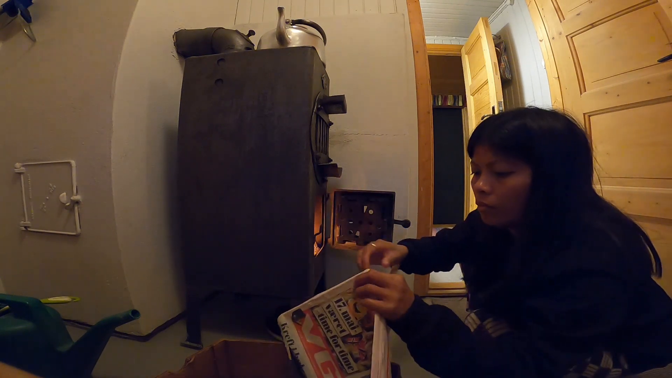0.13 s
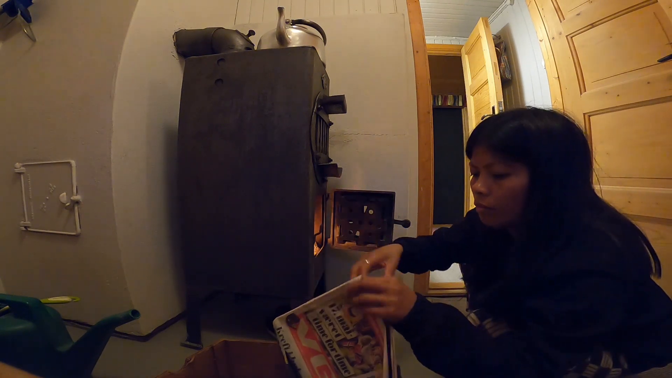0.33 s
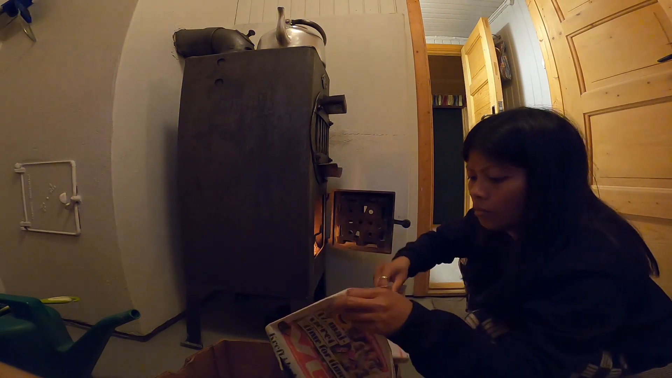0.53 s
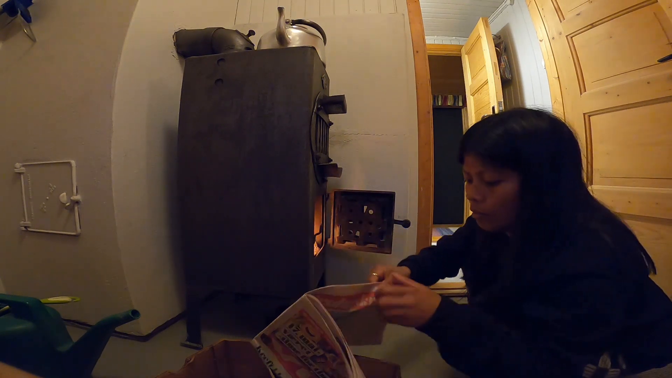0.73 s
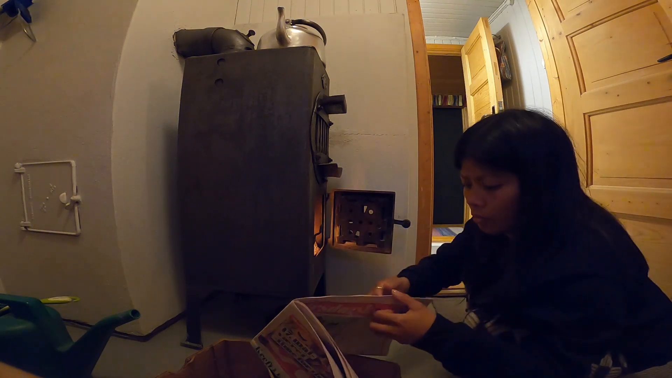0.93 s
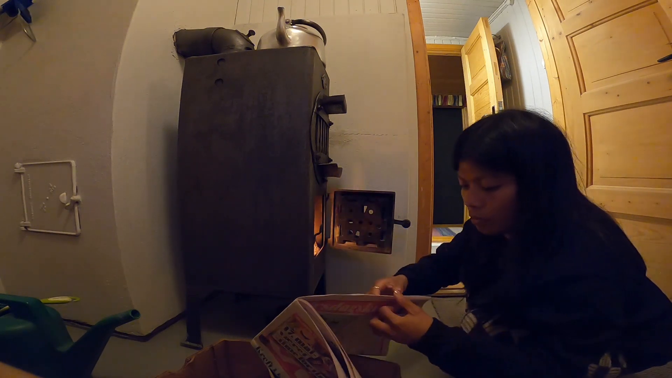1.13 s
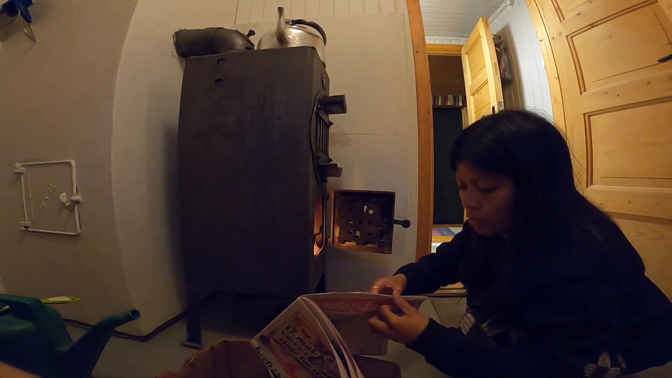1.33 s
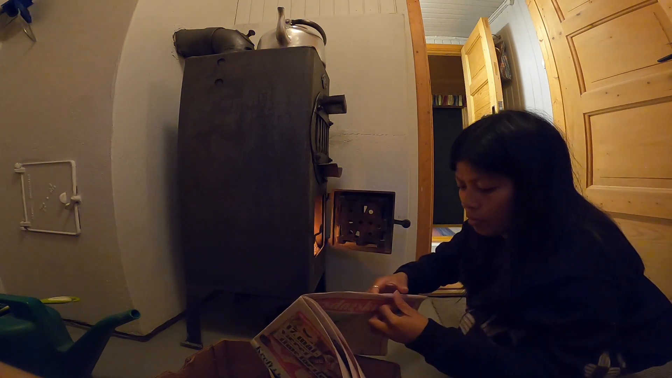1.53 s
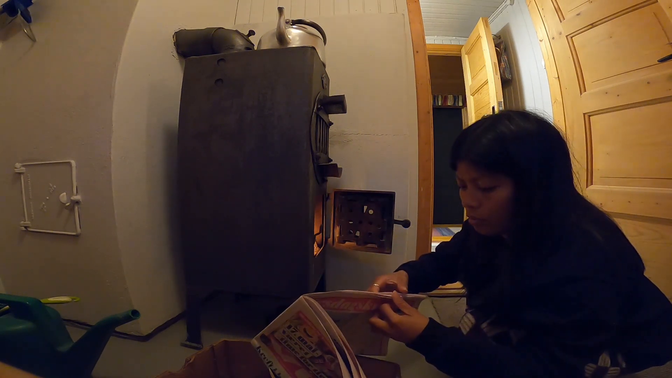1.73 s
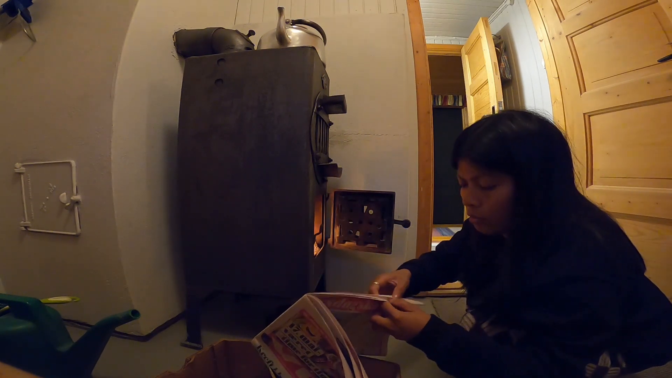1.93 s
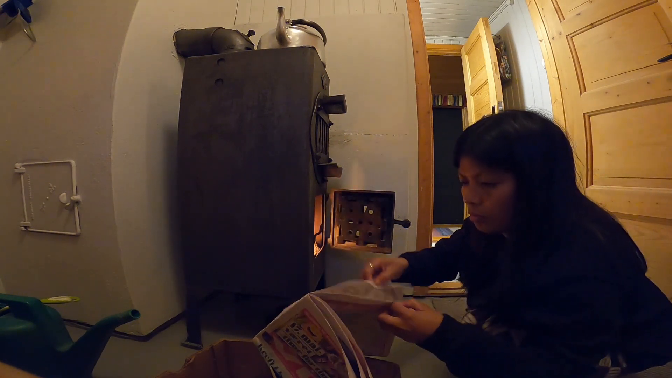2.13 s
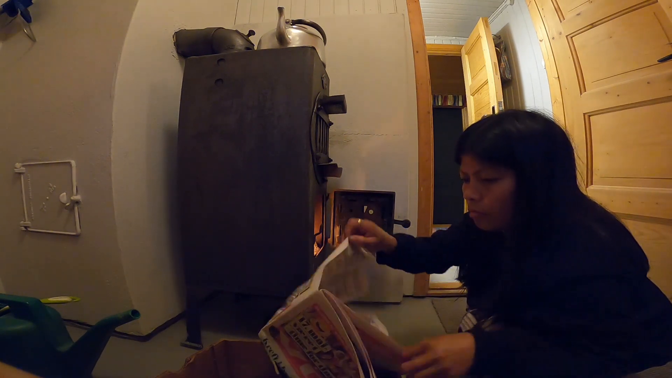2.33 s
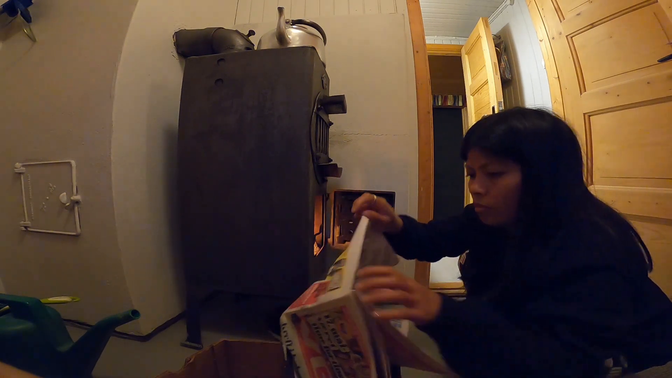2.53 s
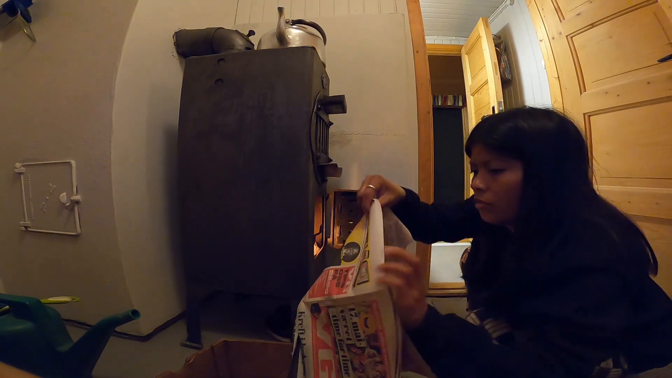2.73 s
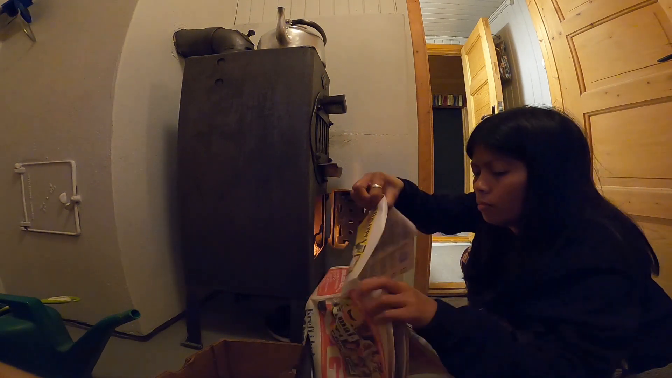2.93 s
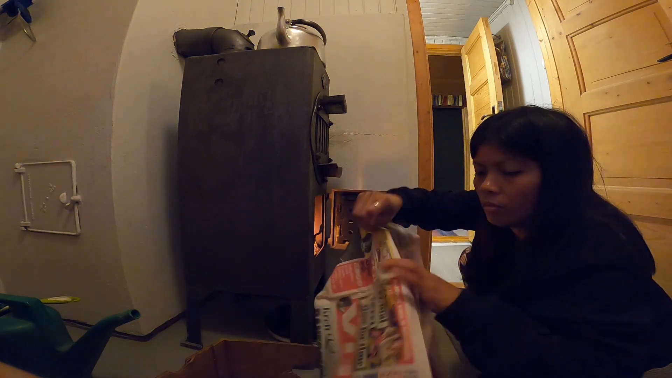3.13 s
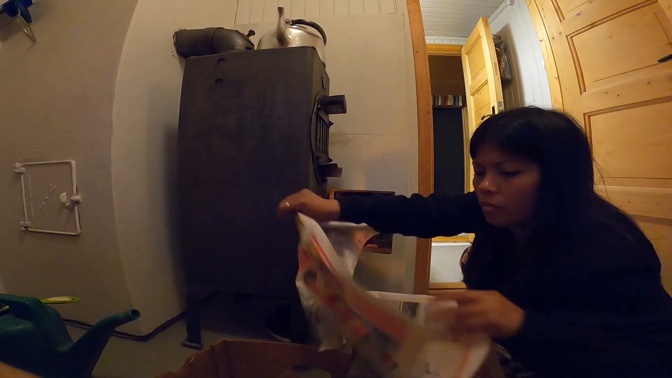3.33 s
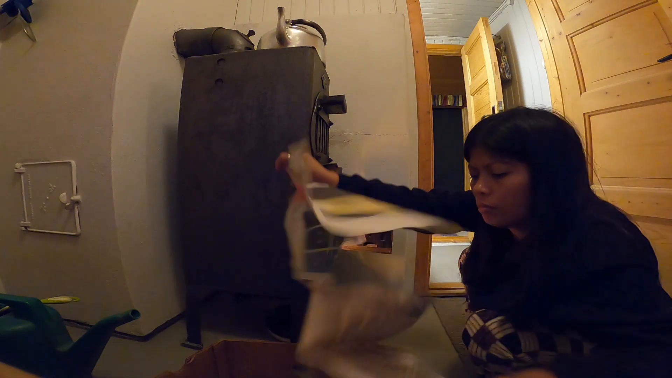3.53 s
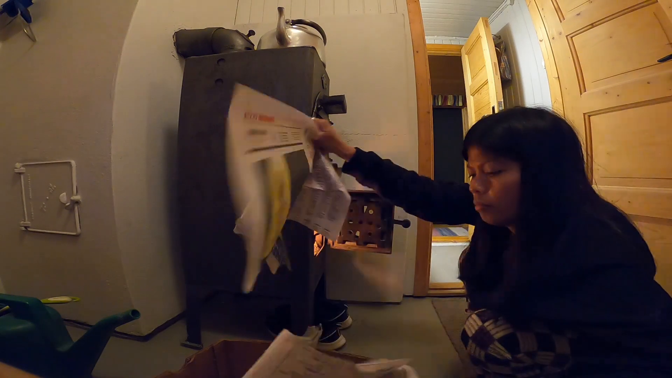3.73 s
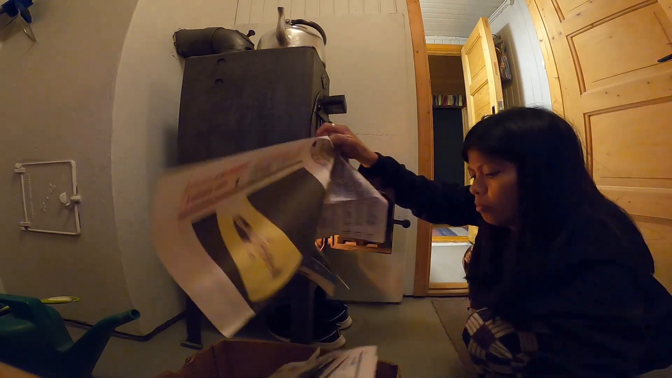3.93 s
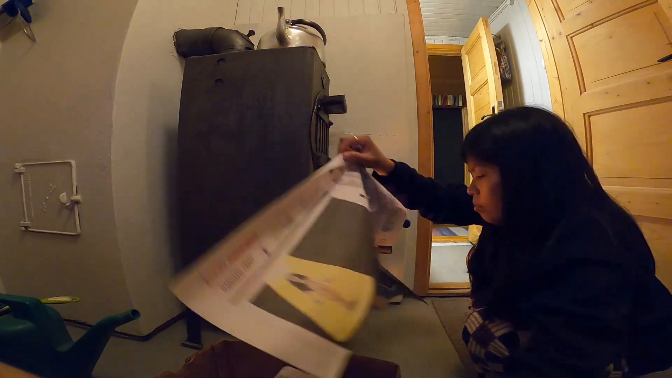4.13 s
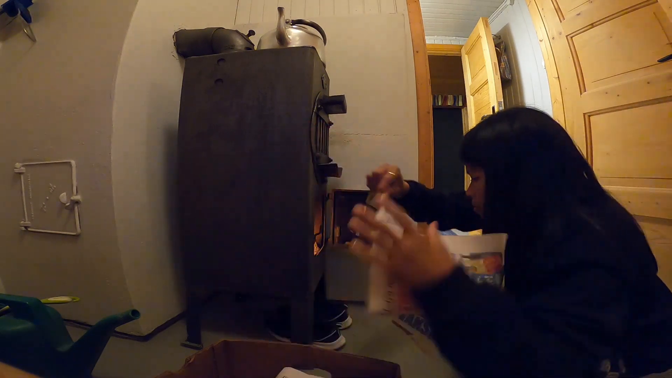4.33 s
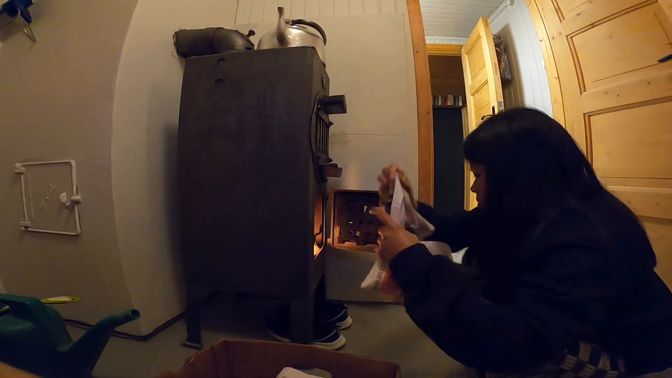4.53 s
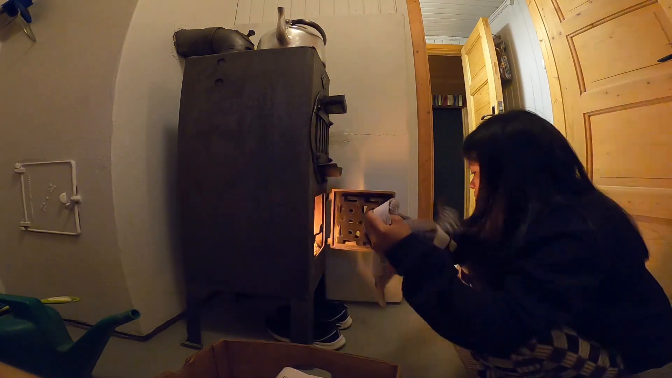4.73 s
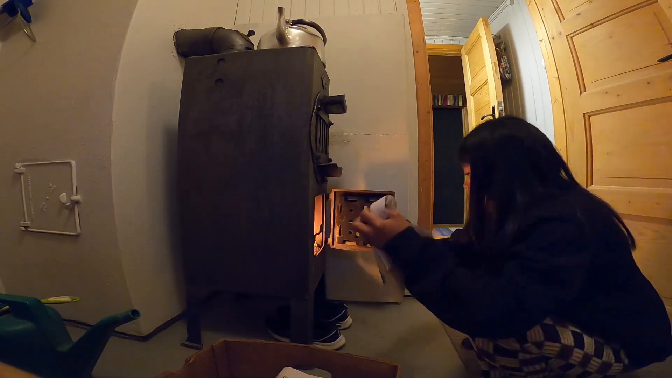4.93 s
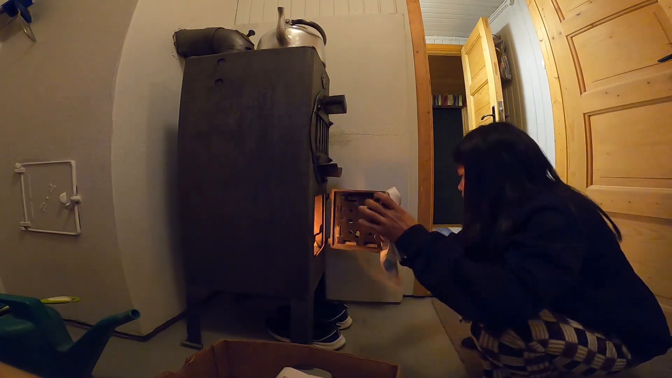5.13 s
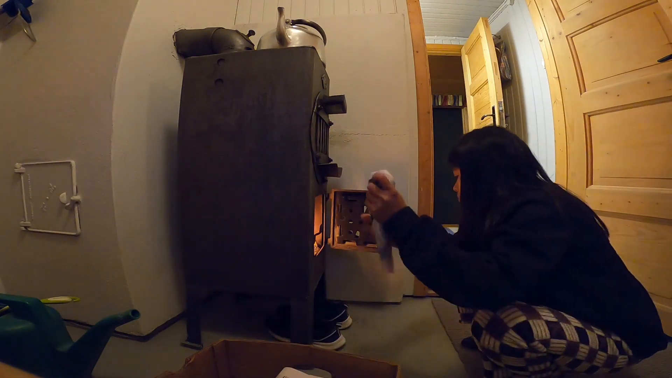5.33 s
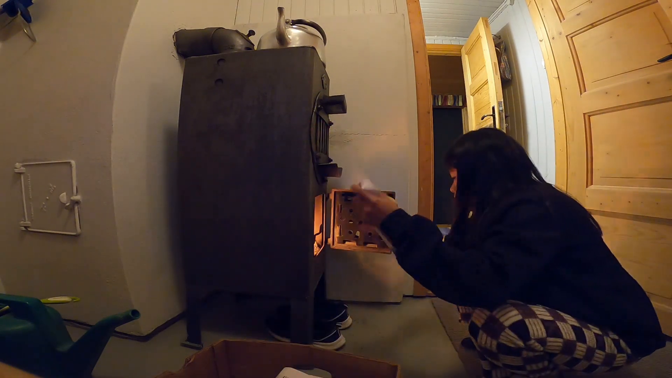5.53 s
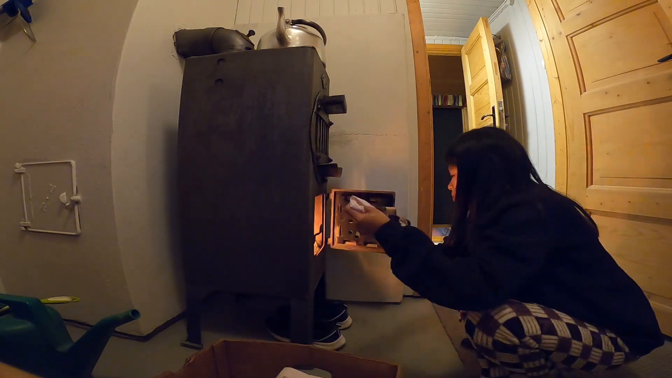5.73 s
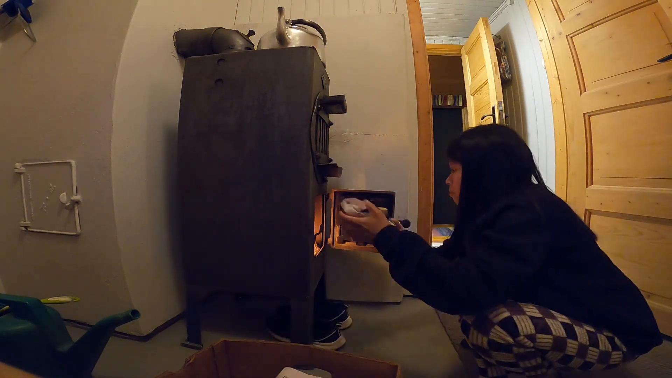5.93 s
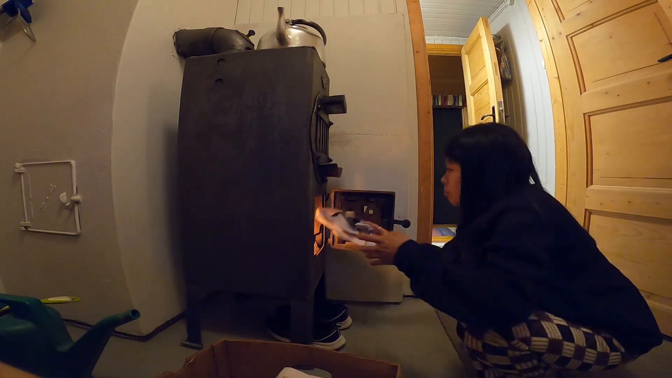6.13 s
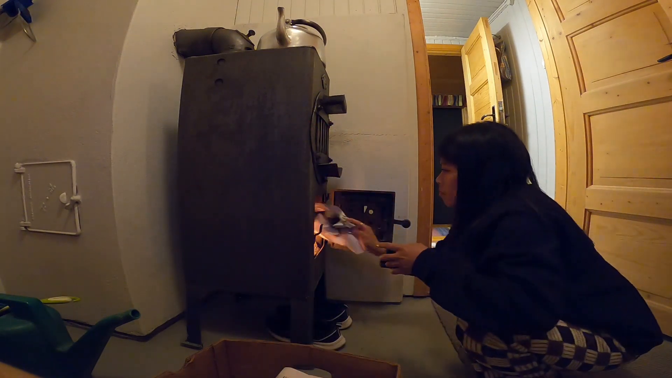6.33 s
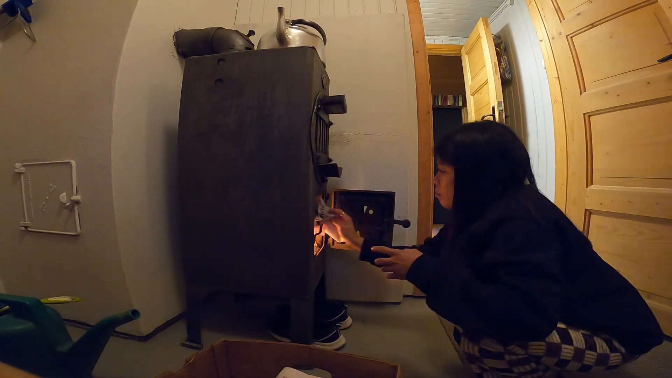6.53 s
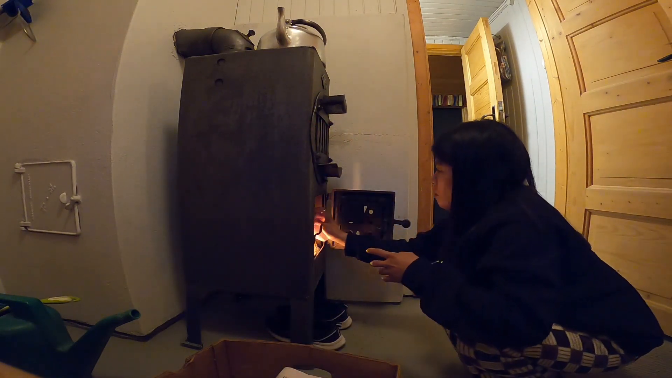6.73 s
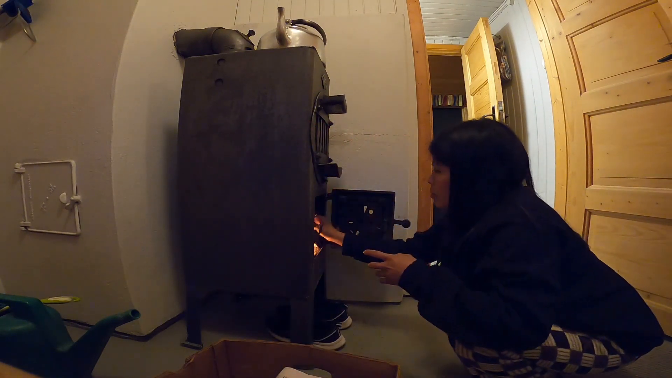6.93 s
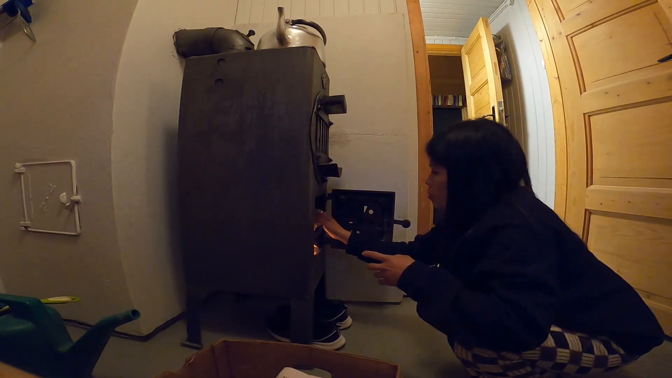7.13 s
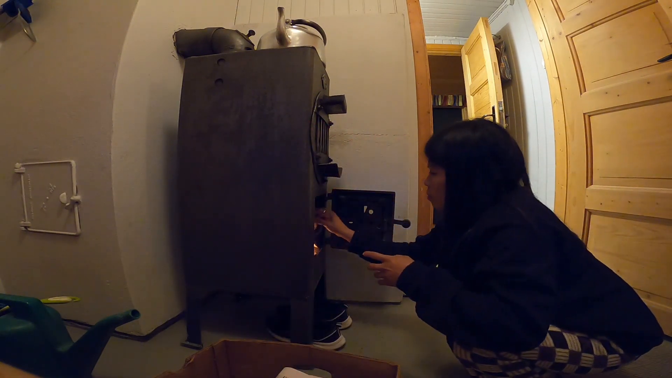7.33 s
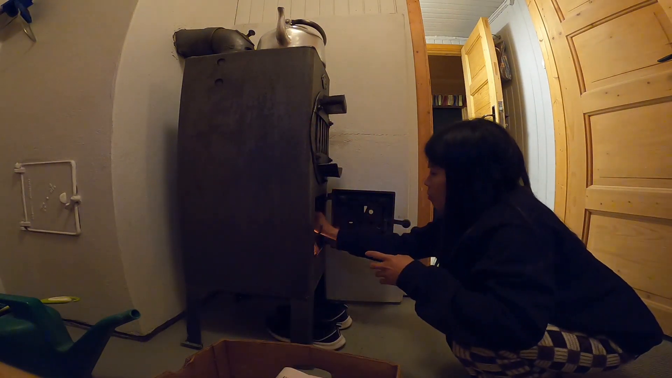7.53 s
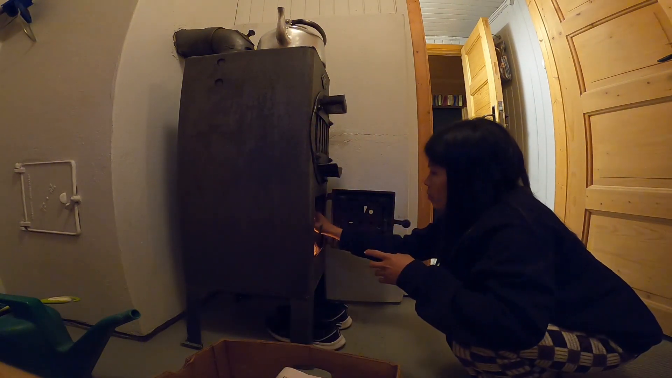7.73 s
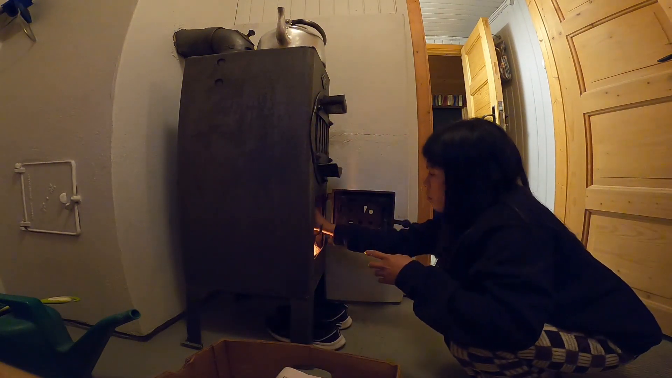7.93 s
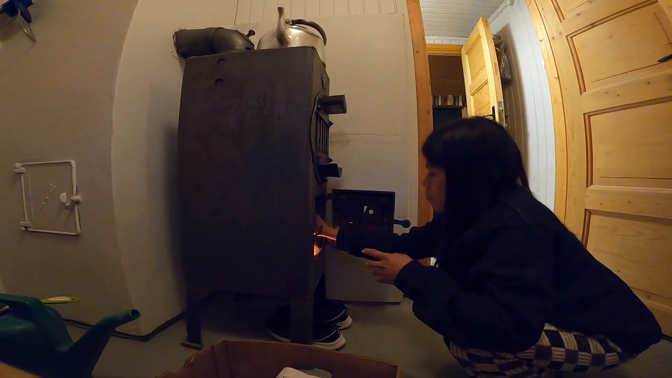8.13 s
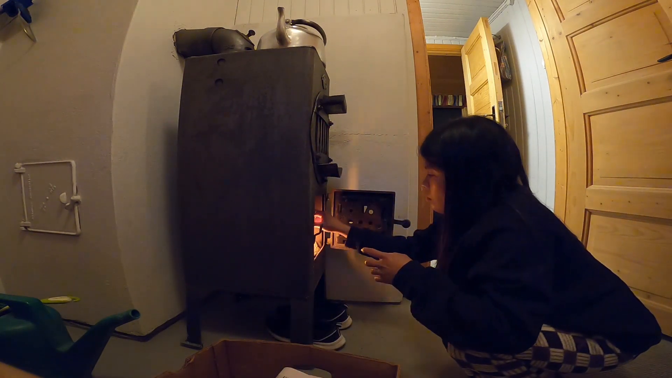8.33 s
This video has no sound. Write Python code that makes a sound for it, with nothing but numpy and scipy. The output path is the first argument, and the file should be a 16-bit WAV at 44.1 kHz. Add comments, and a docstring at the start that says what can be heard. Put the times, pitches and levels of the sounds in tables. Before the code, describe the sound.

Close-up newspaper handling beside a stove in a small, hard-walled room. Brief rustles and clicks come first, then a quiet gap with only faint hiss and a barely audible low flue tone. A sheet is pulled loudly away, flaps, and is scrunched with many bright snaps. Finally, sparse, muted rustling accompanies it into the firebox.

```python
"""Newspaper rustles as hands leaf through it, pull a sheet out, crumple it and push it into a stove.
Thousands of tiny creases are random clicks ringing at several pitches; louder snaps are single sharp clicks.
Folds thud and the sheet flaps: the same kind of crackle at lower pitches. Soft bumps sound the room's low notes.
The flue draught is one wavering tone, over a quiet hiss of filtered noise. The room is small and hard."""
import sys
import numpy as np
from scipy import signal
from scipy.fft import rfft, irfft, next_fast_len
from scipy.io import wavfile
from scipy.ndimage import map_coordinates

SR = 44100
rng = np.random.default_rng(int(sys.argv[2]) if len(sys.argv) > 2 else 0)


def to_wav(s):
    """Save 16-bit WAV."""
    ch = np.atleast_2d(s).T  # columns
    pcm = np.round(np.clip(ch, -1, 1) * 32767)  # PCM
    wavfile.write(sys.argv[1], SR, pcm.astype(np.int16))


def gain_from_db(level_db):
    """Convert decibel levels to linear amplitude factors (20 dB per decade)."""
    decades = np.asarray(level_db, float) / 20
    return 10 ** decades


N = 369558

# how the sheet moves: start_s, flap_db [dB relative to the rustle], fold_db [dB relative to the rustle],
# brightness [dB per octave]
SHEET_MOTION = [(0, -21, -6, -2.5), (.22, -28, -6, -4), (.41, -32, -18, 0.5), (.71, -18, -8, -5),
                (.91, -22, -13, -1), (1.06, -21, -10.5, -5), (1.3, -34, -16, -0.5), (1.86, -19, -10, -6.5),
                (2.15, -27, -19, 1.5), (2.4, -22, -12.5, -3), (2.9, -27.5, -13.5, 2.5),
                (3.7, -26, -13.5, -1.5), (4.05, -29, -13.5, -3), (4.25, -8, -11, -2.5),
                (4.9, -29.5, -15, -0.5), (6.1, -44.5, -20.5, -2), (6.55, -40, -29.5, 1.5),
                (7.05, -32, -18, 1.5), (7.48, -21, -15.5, 1.5), (7.95, -30, -20.5, 3.5),
                (8.14, -28, -10, 2), (8.38, -26, -14, -1)]
# creases that snap: start_s, level_db [peak of the click], pitch_hz,
# edge_db [sharp front, relative to the click, before 15 dB is added]
SNAPPING_CREASES = [(0.054, -24, 2850, -34), (0.1531, -21.5, 2390, -45), (0.187, -15.5, 2000, -30),
                    (0.4949, -26, 1640, -50), (0.5807, -32, 1660, -36), (0.64, -13.5, 1580, -37),
                    (1.0053, -14.5, 2160, -19), (1.0096, -12.5, 3640, -41), (1.2163, -37, 2330, -36),
                    (1.276, -31.5, 1710, -42), (1.5652, -46, 1320, -32), (1.727, -48.5, 3750, -9),
                    (2.0324, -44, 2070, -33), (2.1032, -24, 3530, -47), (2.166, -30.5, 1730, -34),
                    (2.2858, -36, 2470, -32), (2.324, -19, 3240, -35), (2.3568, -14, 2620, -29),
                    (2.4515, -10, 2980, -43), (2.575, -6.5, 4300, -50), (2.634, -11, 4080, -24),
                    (2.6954, -13.5, 3160, -29), (2.7627, -12.5, 2150, -37), (2.7865, -10, 3400, -40),
                    (2.8589, -35, 2900, -18), (2.8793, -10.5, 3120, -15.5), (2.9175, -16, 3500, -35),
                    (2.9754, -19.5, 2180, -7), (3.0568, -13.5, 2370, -29), (3.072, -17, 4190, -29),
                    (3.1694, -8, 3560, -29.5), (3.3392, -10, 1730, -33), (3.6262, -14, 2340, -19),
                    (3.8802, -20.5, 2310, -36), (3.927, -11, 3500, -39), (4.0114, -24.5, 2230, -37),
                    (4.05, -20, 3820, -20), (4.087, -13, 3750, -51), (4.154, -16, 2620, -33),
                    (4.2054, -28, 2990, -36), (4.2756, -19.5, 1580, -39), (4.365, -20.5, 2250, -29),
                    (4.4021, -7.5, 2520, -46), (4.4255, -11, 2550, -44), (4.4452, -4.5, 3580, -38),
                    (4.4933, -10, 2320, -36), (4.5034, -9, 2460, -41), (4.575, -10.5, 2700, -31),
                    (4.651, -12.5, 2920, -25), (4.6993, -14, 1720, -35), (4.7327, -10.5, 2080, -33),
                    (4.9484, -8, 3200, -39), (5.243, -13.5, 1650, -32), (5.3096, -13, 3290, -25),
                    (5.4081, -12, 970, -40), (5.618, -14, 1340, -40), (5.8846, -11, 3250, -33),
                    (6.0269, -18, 2400, -39), (6.2235, -26.5, 3130, -31.5), (6.5397, -31.5, 2650, -26.5),
                    (6.591, -32, 3640, -33), (6.7294, -33, 2800, -29), (6.9855, -30, 1720, -35),
                    (7.053, -23, 2900, -29), (7.5916, -36, 1670, -32), (7.8675, -60, 1676, -33),
                    (8.1321, -29.5, 1830, -31)]
# sheets and arms bump the floor and stove: start_s, level_db [each sound made by a bump adds its own offset]
SOFT_BUMPS = [(0.619, -41), (0.701, -36.5), (1.033, -37.5), (2.175, -51), (2.43, -43), (2.553, -34),
              (3.06, -42.5), (3.406, -24.5), (3.656, -35), (4.43, -33), (4.596, -34), (6.745, -59),
              (7.629, -49.5), (7.828, -51), (8.138, -46.5), (8.268, -50)]
# colour of creasing paper: pitch_hz, level_db [relative]
PAPER_COLOUR = [(560, -42.5), (830, -18.5), (990, -5), (1250, -8), (2400, -4), (4360, -5.5), (7230, -12),
                (7960, -18), (12400, -26), (14400, -35), (16000, -54)]


def unit(x):
    """Scales a sound to rms 1."""
    return x / np.sqrt(np.mean(x ** 2) + 1e-20)


def along(points, hz):
    """Reads (Hz, value) points on a logarithmic frequency axis."""
    f, v = np.transpose(points)
    return np.interp(np.log(hz + 1), np.log(f + 1), v)


def curves(rows):
    """Joins the table rows with lines: one value per sample for each column after the time."""
    s, *cols = np.vstack(rows).T
    return [np.interp(np.arange(N) / SR, s, c) for c in cols]


def wobble(rate):
    """Draws a smooth random curve with this many random points a second."""
    points = rng.standard_normal(int(N * rate / SR) + 4)
    return map_coordinates(points, [np.arange(N) * rate / SR])


def filtered(x, response):
    """Multiplies the spectrum of x by a response given as a function of frequency."""
    m = next_fast_len(x.shape[-1] + 8192)
    spectrum = rfft(x, m) * response(np.fft.rfftfreq(m, 1 / SR))
    return irfft(spectrum, m)[..., :x.shape[-1]]


def causal(colour):
    """Makes a minimum-phase response from (Hz, dB) points, so that clicks start sharply."""
    def response(hz):
        cepstrum = irfft(np.log(gain_from_db(along(colour, hz)) + 1e-6))
        half = len(cepstrum) // 2
        # fold the backward half of time onto the forward half
        cepstrum[1:half] *= 2
        cepstrum[half + 1:] = 0
        return np.exp(rfft(cepstrum))
    return response


def ring(centre_hz, q, floor):
    """Makes a broad resonance over a flat floor."""
    def response(f):
        damping = 1j * f * centre_hz / q
        return floor + damping / (centre_hz ** 2 - f * f + damping)
    return response


def heard(x, lag_s, wet_db):
    """Places a source in both channels, the left later by lag_s, with a decaying noise tail for the room."""
    # time for the room tail to fall by 60 dB: pitch_hz, t60_s
    room_decay = [(200, 0.15), (530, 0.092), (1400, 0.14), (3700, 0.16), (9700, 0.073)]
    hz, t, z = signal.stft(rng.standard_normal((3, SR // 3)), SR, nperseg=256)
    alike = np.clip(.75 - hz / 7000, 0, 1)[:, None]  # long waves reach both channels more alike
    z = np.sqrt(alike) * z[0] + np.sqrt(1 - alike) * z[1:]
    decay = gain_from_db(-60 * t / along(room_decay, hz)[:, None])
    tail = signal.istft(z * decay, SR, nperseg=256)[1]
    tail = np.pad(tail / np.linalg.norm(tail[0]), ((0, 0), (130, 0)))  # about 3 ms before the tail begins
    wet = signal.fftconvolve(x[None], tail, axes=1)[:, :len(x)]
    delay_s = (np.array([[lag_s], [-lag_s]]) + 0.00094) / 2  # a shared delay keeps both positive
    return filtered(x + gain_from_db(wet_db) * wet, lambda f: np.exp(-2j * np.pi * f * delay_s))


def bursts(rows, rise, triggers_s=()):
    """Sums the power of (s, peak dB, dying s) bursts; a burst just after a trigger is hushed before it."""
    t = np.arange(0, N + 32, 32) / SR
    s, peak_db, dying_s = np.transpose(rows)[..., None]
    dying_s = np.clip(dying_s, .02, .4)  # time to fall by 20 dB
    rise_s = np.minimum(rise * dying_s, 0.1)  # time to swell by 20 dB
    level_db = peak_db - 20 * np.maximum((t - s) / dying_s, (s - t) / rise_s)
    # a tug within 0.03 s after a snap is let loose by it: 8 dB quieter until the snap
    trigger_s = np.append(triggers_s, np.inf)
    first_s = trigger_s[np.searchsorted(trigger_s, s - .03)]
    level_db += -8 * ((first_s < s) & (t < first_s))
    return np.interp(np.arange(N) / SR, t, gain_from_db(2 * level_db).sum(0))


def creases(rate, tail_db, clump_db):
    """Scatters tiny buckles as random clicks: a few much larger than the rest, coming in clumps."""
    happens = rng.random(N) < rate / SR  # rate: creases per second
    clumps = wobble(14) + 0.94 * wobble(45)
    size = gain_from_db(tail_db * np.minimum(rng.exponential(size=N), 3.5) + clump_db * clumps)
    return unit(happens * size * rng.choice([-1, 1], N))


def patches(level_db, pitches_hz, colour, rate, clump_db, wet_db, tilt_db=0):
    """Lets patches of the sheet of different size crackle, each at its own pitch and place."""
    out = 0
    for patch_hz in pitches_hz:
        patch = unit(filtered(creases(rate, 3, clump_db), ring(patch_hz, q=1.8, floor=.22)))
        patch = patch * gain_from_db(tilt_db * np.log2(patch_hz / 2600))  # tight paper favours the small, high patches
        out = out + heard(gain_from_db(level_db) * patch, lag_s=rng.normal(4e-5, 2.5e-5), wet_db=wet_db)
    out = filtered(out, causal(colour))
    return unit(out) * np.sqrt(np.mean(gain_from_db(2 * level_db)))  # overall level follows level_db


def hiss():
    """The quiet room and microphone floor: filtered noise, partly shared by both channels."""
    # colour of the hiss: pitch_hz, level_db [relative]
    hiss_colour = [(25, -11), (50, -14), (110, 9), (300, 9), (650, -7), (2060, -11), (4000, -24),
                   (7300, -3.5), (8300, -16), (16000, -23.5)]
    shared, left, right = rng.standard_normal((3, N))
    noise = np.array([shared + 1.7 * left, shared + 2.4 * right])
    floor_db = -74 + 1.5 * wobble(4)
    return gain_from_db(floor_db) * unit(filtered(noise, lambda f: gain_from_db(along(hiss_colour, f))))


def draught():
    """Air drawn up the flue sounds one unsteady low note."""
    # the notes of the draught: start_s, pitch_hz [before flutter], level_db [before the offset and wobble below]
    draught_notes = [
        [(1.35, 137, -83), (1.452, 144, -78), (1.506, 180, -76.5), (2.08, 213.5, -77)],
        [(6.25, 224, -78), (6.376, 162, -72), (6.404, 207, -79), (7.392, 192.2, -76), (7.6, 153, -75)],
    ]
    pitch_hz, level_db = curves(draught_notes)
    flutter_hz = 15 * wobble(30)
    phase = 2 * np.pi * np.cumsum(pitch_hz + flutter_hz) / SR
    unsteady_db = level_db + 1.5 + 4.1 * wobble(33)
    note = np.sqrt(2) * gain_from_db(unsteady_db) * np.sin(phase)
    return heard(note, lag_s=3e-5, wet_db=1.5)


def bumps():
    """Each soft bump sets the room's lowest notes sounding, and they die away."""
    # lowest room notes: pitch_hz, level_db [relative, varied at each bump], t60_s [time to fall by 60 dB]
    room_notes = [(93, -4.5, 0.13), (134.6, 1, 0.08)]
    t = np.arange(SR // 3) / SR
    swell = 1 - np.exp(-t / 0.0076)  # a soft start
    out = np.zeros(N + SR)
    for s, db in SOFT_BUMPS:
        notes = 0
        for hz, level_db, t60_s in room_notes:
            varied_db = level_db + rng.normal(0, 3.9)
            notes = notes + gain_from_db(varied_db - 60 * t / t60_s) * np.sin(2 * np.pi * hz * t)
        out[round(s * SR):][:len(t)] += gain_from_db(db + 5.0) * swell * notes
    return out[:N] * gain_from_db([[.7], [-.7]])  # left slightly louder


def flaps(rustle_db):
    """The whole sheet flaps as it moves, and each bump moves air too: a low crackle."""
    # colour of the flapping: pitch_hz, level_db [relative]
    flap_colour = [(15, -27), (28, -18.5), (65, -18.5), (125, -5.5), (175, -3.5), (230, -57), (370, -120)]
    flap_db, _, _ = curves(SHEET_MOTION)
    gusts = bursts([(s, db - 10.5, 0.22) for s, db in SOFT_BUMPS], rise=1)
    flap_db = 10 * np.log10(gain_from_db(2 * (rustle_db + flap_db)) + gusts)
    return patches(flap_db, [50], flap_colour, rate=150, clump_db=4.5, wet_db=1.5)


def folds(rustle_db):
    """Large folds thud as they buckle, more so at each bump: crackle at middle pitches."""
    # colour of the folds: pitch_hz, level_db [relative]
    fold_colour = [(120, -27), (210, -3.5), (314, -2.5), (380, -7), (480, -2.5), (650, -3), (900, -1.5),
                   (1200, -21), (2090, -120)]
    _, fold_db, _ = curves(SHEET_MOTION)
    thuds = bursts([(s, db - 6.5, 0.051) for s, db in SOFT_BUMPS], rise=1)
    fold_db = 10 * np.log10(gain_from_db(2 * (rustle_db + fold_db)) + thuds)
    return patches(fold_db, [244, 355, 497, 650, 860], fold_colour, rate=300, clump_db=2.5, wet_db=-1.0)


def snaps():
    """A crease gives way with a short ringing click, and its neighbours follow in a dying crackle."""
    t = np.arange(SR // 4) / SR
    out = np.zeros((2, N + SR))
    paper = causal(PAPER_COLOUR)
    for s, db, pitch_hz, edge_db in SNAPPING_CREASES:
        crackle = gain_from_db(-14.5 - 60 * t / 0.057) * rng.standard_normal(len(t)) * rng.exponential(size=len(t))
        crackle[0] = 3  # the click itself
        snap = filtered(crackle, lambda f: paper(f) * ring(pitch_hz, q=2.2, floor=.15)(f))
        snap *= gain_from_db(db) / np.abs(snap[:30]).max()
        # the sharp front: one click with only its treble kept
        edge = filtered(1. * (t == 0), lambda f: paper(f) * (1j * f / (6500 + 1j * f)) ** 3)
        snap += edge * gain_from_db(db + edge_db + 15) / np.abs(edge).max()
        start = round(s * SR)
        out[:, start:start + len(t)] += heard(snap, lag_s=rng.normal(4e-5, 2.2e-5), wet_db=-4)
    return out[:, :N]


def creasing_level():
    """The hands' steady work plus the bursts of creasing at each tug, as one level in dB."""
    # the steady rustle of the hands on the paper: start_s, level_db
    steady_work = [(0, -45.5), (.3, -49.5), (.95, -45), (1.1, -64), (1.38, -76), (1.65, -71), (1.86, -80),
                   (2.02, -73), (2.1, -52), (2.32, -50), (2.5, -32), (2.72, -29.5), (2.96, -42),
                   (3.1, -27.5), (3.54, -27), (3.61, -39), (3.72, -32), (3.86, -38), (4.38, -41),
                   (4.42, -25.5), (4.56, -27.5), (4.63, -22.5), (5.0, -21.5), (5.04, -26), (5.8, -28),
                   (6.12, -34), (6.2, -49), (6.4, -51), (6.9, -53), (7.2, -56), (7.33, -65), (7.5, -74),
                   (7.58, -74), (7.63, -52), (7.85, -57), (8.07, -52.5), (8.38, -40.5)]
    # tugs and squeezes, each a burst of creasing: start_s [moment of the peak], level_db [peak],
    # dying_s [s to fall by 20 dB, held between 0.02 and 0.4 s in bursts()]
    tugs = [(.051, -35.5, 0.1046), (.196, -26, 0.0465), (.5, -47, 0.16), (.591, -32.5, 0.11),
            (.647, -26, 0.0349), (.702, -33, .12), (1.014, -30.5, .08), (1.07, -37.5, 0.0964),
            (1.225, -49.5, .08), (1.281, -46, .07), (1.445, -64.5, -0.3), (1.572, -63, .15),
            (1.948, -64, -0.5), (2.036, -58.5, -2), (2.107, -39.5, .12), (2.183, -37, 0.3),
            (2.251, -34.5, .05), (2.291, -35, -0.2), (2.33, -37.5, .05), (2.359, -29, .1),
            (2.419, -27.5, -0.03), (2.458, -36.5, 4), (2.555, -23, .09), (2.678, -32.5, -0.1),
            (2.79, -24.5, .1), (2.889, -22.5, 0.07), (2.985, -25, 0.09), (3.069, -19, .09),
            (3.177, -22, 0.17), (3.281, -21, 0.12), (3.408, -15.5, 0.1032), (3.52, -18.5, 0.1027),
            (3.636, -21.5, 0.09), (3.692, -20.5, 0.14), (3.887, -29, 0.06), (3.935, -26.5, 0.08),
            (4.095, -30, .07), (4.159, -42, 1), (4.206, -35, 0.17), (4.294, -29.5, .09), (4.5, -43, 5),
            (4.594, -20.5, 0.25), (5.2, -25.5, .4), (5.43, -25.5, 1), (5.52, -24, 0.22),
            (5.639, -27.5, 0.1744), (5.883, -24, 0.1963), (6.034, -31, 0.1244), (6.13, -29, .08),
            (6.234, -41, 0.1), (6.59, -46.5, 0.3), (6.738, -45.5, .19), (6.935, -46.5, .06),
            (6.992, -38, .1), (7.064, -33.5, .13), (7.192, -40, .13), (7.26, -50, .08), (7.41, -54, .1),
            (7.6, -45, .15), (7.67, -37, .16), (7.765, -38.5, .09), (7.878, -46, 0.1), (7.99, -48.5, -0.5),
            (8.13, -38.5, .1), (8.165, -41, 0.2), (8.345, -39, .2)]
    steady_db, = curves(steady_work)
    snap_times_s = [snap[0] for snap in SNAPPING_CREASES]
    return 10 * np.log10(gain_from_db(2 * steady_db) + bursts(tugs, rise=0.79, triggers_s=snap_times_s))


def rustle(rustle_db):
    """Small creases rustle: many tiny buckles ring in patches of paper, brighter when it is tight."""
    _, _, bright_db = curves(SHEET_MOTION)
    return patches(rustle_db - .8, np.geomspace(1100, 6500, 7), PAPER_COLOUR, rate=260, clump_db=2.0,
                   wet_db=0.0, tilt_db=bright_db)


def scene():
    """Adds the hiss, draught and bumps to all the sounds of the paper."""
    rustle_db = creasing_level()
    background = hiss() + draught() + bumps()
    return background + flaps(rustle_db) + folds(rustle_db) + snaps() + rustle(rustle_db)


def band_limit(x):
    """A steep low-pass at the top of the band."""
    return signal.sosfilt(signal.butter(12, 16670, fs=SR, output="sos"), x)


def record(dry):
    """Gives the left and right channels slightly different colours."""
    # difference between the channels: pitch_hz, level_db [left over right]
    left_over_right = [(200, 1), (700, -0.5), (2400, 3), (5000, 2.5), (9000, 0), (15000, -2.5)]
    half = np.array([[.5], [-.5]])  # half the difference up on the left, half down on the right
    finished = filtered(dry, lambda f: gain_from_db(half * along(left_over_right, f)))
    return band_limit(finished)


dry = scene()
out = record(dry)
to_wav(out)
```